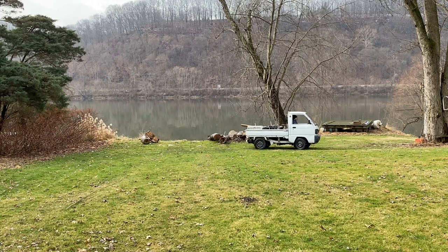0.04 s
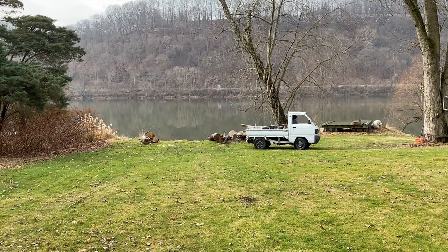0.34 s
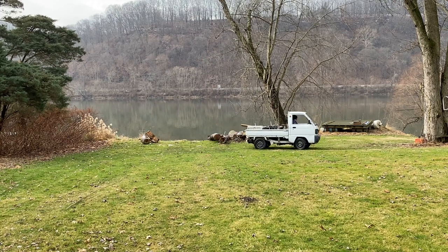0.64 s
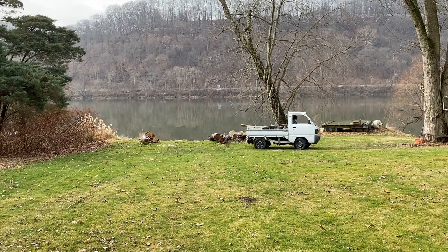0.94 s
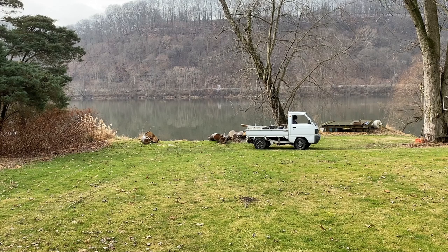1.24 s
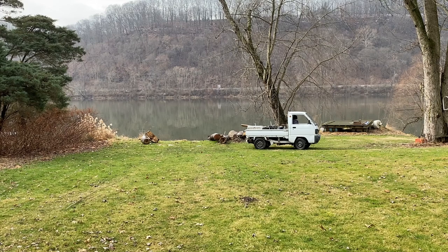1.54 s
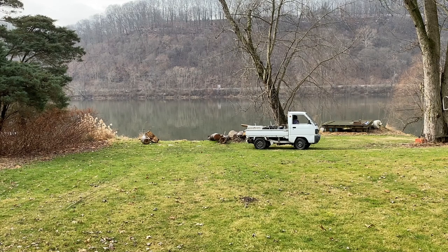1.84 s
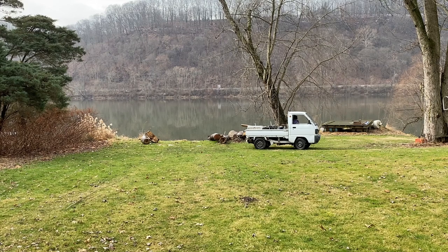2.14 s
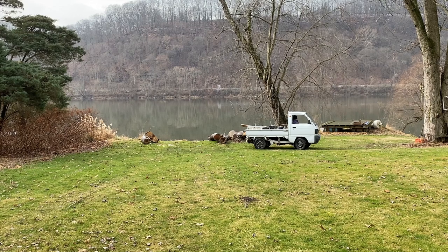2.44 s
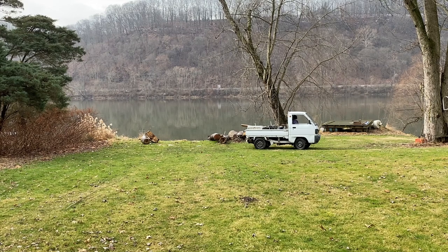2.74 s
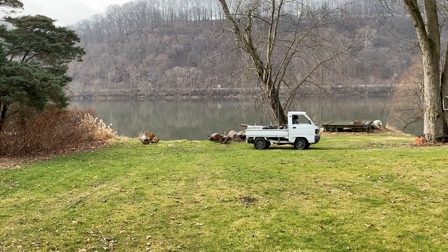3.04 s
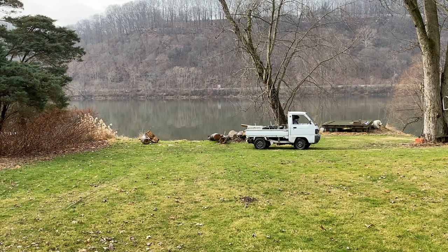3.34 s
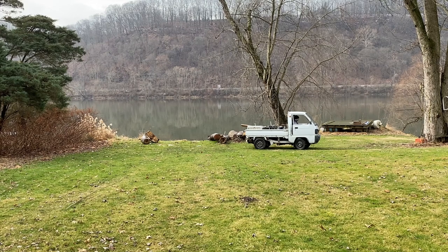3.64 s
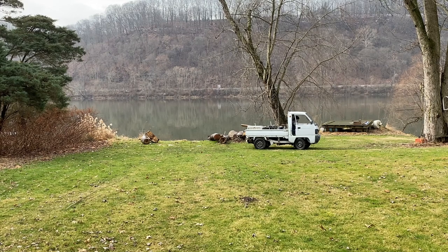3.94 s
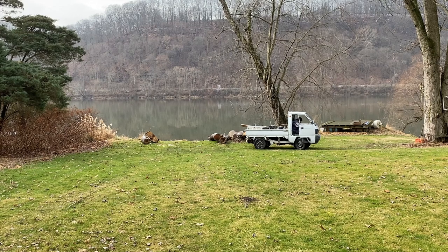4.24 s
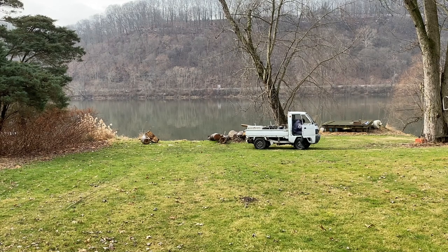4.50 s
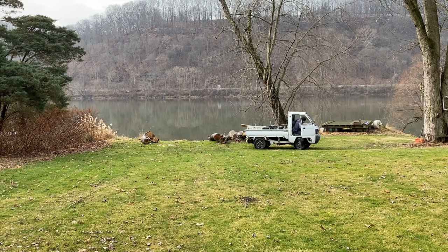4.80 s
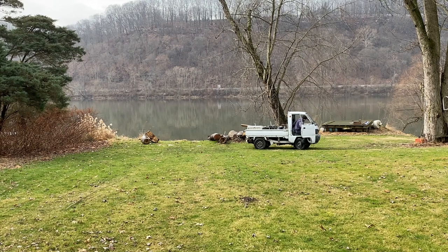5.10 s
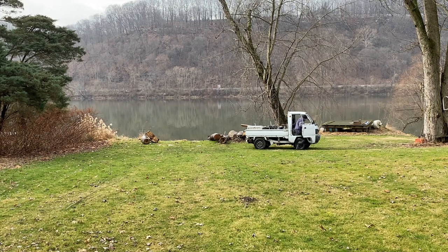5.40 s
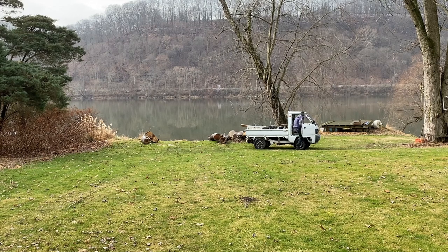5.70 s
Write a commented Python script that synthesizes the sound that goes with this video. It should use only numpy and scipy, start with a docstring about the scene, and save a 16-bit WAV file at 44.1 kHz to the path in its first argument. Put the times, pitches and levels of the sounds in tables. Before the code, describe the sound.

A small truck idles for an instant, then is switched off and runs down in slowing puffs as its bed shudders and rattles. The door latch snaps sharply, the hinge gives tiny squeaks, and hollow knocks and a deep thud come from the cab. Cloth rustles faintly at the end. It is heard from some way off outdoors, with small birds calling over a low, distant valley hum.

```python
"""A small three-cylinder truck idles some way off on a lawn by a river, over a far valley hum.
Switched off, it runs down: slowing puffs ring the exhaust, and the bed shudders, thumps and groans.
Small birds start calling from the trees. As the engine stops, the door latch snaps and the cab booms.
The door squeaks open on its dry hinge, and knocks ring and rattle the cab's panels.
Last, cloth rustles on the seat."""
import sys
import numpy as np
from scipy import signal
from scipy.fft import rfft, irfft, next_fast_len
from scipy.io import wavfile
from scipy.ndimage import uniform_filter1d

SR = 44100
rng = np.random.default_rng(int(sys.argv[2]) if len(sys.argv) > 2 else 0)


def inscribe(sig):
    """Save sig as 16-bit PCM at rate SR to the path in sys.argv[1].

    A 1-D sig is mono; a 2-D sig holds one channel per row.
    Samples are clipped to [-1, 1] before scaling.
    """
    pcm = np.round(np.clip(np.atleast_2d(sig).T, -1, 1) * 32767)
    wavfile.write(sys.argv[1], SR, pcm.astype(np.int16))


N = 258423
TIME = np.arange(N) / SR


def from_db(db):
    """Decibels to gain."""
    return 10 ** (np.asarray(db) / 20)


def rms_one(x):
    """Scale to unit power."""
    return x / np.sqrt(np.mean(x ** 2) + 1e-20)


def even(x):
    """Hold at unit power, keeping only the fast throb."""
    return x / np.sqrt(np.abs(uniform_filter1d(x ** 2, SR // 6)) + 1e-14)


def gain_curve(rows):
    """Per-sample gain from (time [s], level [dB])."""
    return from_db(np.interp(TIME, *np.transpose(rows)))


def at_hz(rows, hz):
    """Read a table on a log-frequency axis."""
    row_hz, values = np.transpose(rows)
    return np.interp(np.log(hz), np.log(row_hz), values)


def add(out, start_s, sound):
    """Mix a sound in at start_s."""
    i = int(start_s * SR)
    out[..., i:i + sound.shape[-1]] += sound[..., :N - i]


def pan(left_db):
    """Channel gains, left over right by left_db."""
    return from_db(np.array([[left_db], [-left_db]]) / 2)


def drift(rate_hz, count=N):
    """Random wander between unit-spread knots."""
    knots = rng.standard_normal(2000)
    return np.interp(TIME[:count] * rate_hz, np.arange(len(knots)), knots)


def cut(x, hz, kind, order=2):
    """Butterworth low- or high-pass."""
    return signal.sosfilt(signal.butter(order, hz, kind, fs=SR, output="sos"), x)


def noise(spectrum, likeness, count=N):
    """Unit-power stereo noise of given spectrum and left-right correlation."""
    size = next_fast_len(count)
    hz = np.maximum(np.arange(size // 2 + 1) * SR / size, 1)
    mid, side = rfft(rng.standard_normal((2, size)))
    alike = at_hz(likeness, hz)
    pair = np.sqrt(1 + alike) * mid + np.sqrt(1 - alike) * side * [[1], [-1]]
    return rms_one(irfft(pair * from_db(at_hz(spectrum, hz)), size)[:, :count])


def resonate(x, modes):
    """Drive parallel band-pass resonances."""
    out = 0
    for hz, width_hz, db in modes:
        r = np.exp(-np.pi * width_hz / SR)
        zeros = np.array([1, 0, -1]) * (1 - r * r) / 2
        poles = [1, -2 * r * np.cos(2 * np.pi * hz / SR), r * r]
        out = out + from_db(db) * signal.lfilter(zeros, poles, x + 1e-18)
    return out


def struck(blows, modes, spread_db=2):
    """Blows (time [s], level [dB]) ring every mode, each with slightly different weights."""
    times_s, blow_db = np.transpose(blows)
    weights_db = rng.normal(0, spread_db, (len(blows), len(modes)))
    out = np.zeros(N)
    for k, (hz, db, t60_s) in enumerate(modes):
        clicks = np.full(N, 1e-18)
        clicks[(times_s * SR).astype(int)] = (-1) ** k * from_db(blow_db + db + weights_db[:, k])
        r, w = from_db(-60 / (t60_s * SR)), 2 * np.pi * hz / SR
        out += signal.lfilter([0, np.sin(w)], [1, -2 * r * np.cos(w), r * r], clicks)
    return out


def glide(length_s, pitches_hz):
    """Phase and rounded envelope of a tone curving through pitches evenly spaced in time."""
    progress = np.linspace(0, 1, int(length_s * SR))
    curve = np.polyfit(np.linspace(0, 1, len(pitches_hz)), pitches_hz, len(pitches_hz) - 1)
    phase = 2 * np.pi * np.cumsum(np.polyval(curve, progress)) / SR
    return phase, np.abs(np.sin(np.pi * progress))


def notes(rows, pitch_ratios, waver_rad, waver_hz=400):
    """Wavering sine notes sharing one pitch contour."""
    out = np.zeros(N)
    for s, length_s, hz, db in rows:
        phase, swell = glide(length_s, hz * np.array(pitch_ratios))
        add(out, s, from_db(db) * swell * np.sin(phase + waver_rad * drift(waver_hz, len(phase))))
    return out


# air spectrum: (frequency [Hz], density [dB])
AIR = [(20, -37), (40, 0.5), (71, 1.5), (120, -4.5), (250, -17.5), (500, -22), (900, -26), (1300, -33.5),
       (2000, -37), (4000, -44.5), (7000, -50), (10500, -51.5), (15000, -75)]
# left-right likeness of the air: (frequency [Hz], correlation)
AIR_LIKENESS = [(60, 0.98), (250, 0.75), (700, 0.022), (2000, 0.076), (8000, 0.1)]
def valley_air(level_db=-61):
    """Far valley hum, gently wandering in level."""
    return from_db(level_db + drift(24) + 1.3 * drift(8.5)) * noise(AIR, AIR_LIKENESS)


IDLE_HZ, IGNITION_OFF_S = 50.6, 0.165
def firing_hz(friction_hz_per_s=17, drag_per_s=0.2):
    """Steady idle; with the ignition cut, dry friction and drag bring the engine to rest."""
    coasting_s = np.maximum(TIME - IGNITION_OFF_S, 0)
    offset_hz = friction_hz_per_s / drag_per_s
    return np.maximum((IDLE_HZ + offset_hz) * np.exp(-drag_per_s * coasting_s) - offset_hz, 0)


def cylinder_puffs(cycles, speed, jitter_cycles=0.022, imbalance_db=(3, -3, 0)):
    """One impulse per stroke; the slower the engine, the more unevenly its cylinders chug."""
    stroke = np.maximum.accumulate(np.floor(cycles + jitter_cycles * speed * drift(40)))
    limp_db = np.take(imbalance_db, stroke.astype(int) % 3) * (1 - speed)
    return np.diff(stroke, prepend=stroke[0]) * from_db(limp_db + drift(50.1))


# pipe resonances: (frequency [Hz], width [Hz], gain [dB])
PIPE_MODES = [(86, 12.5, 18), (166, 10.2, 3)]
# exhaust envelope: (time [s], level [dB])
EXHAUST_LEVEL = [(0.0, -40), (0.1, -38), (0.14, -40.5), (0.18, -35.5), (0.47, -34.5), (0.73, -41),
                 (0.77, -36.5), (0.9, -40.5), (0.97, -38), (1.09, -39.5), (1.13, -42), (1.32, -44.5),
                 (1.41, -43.5), (1.5, -46.5), (1.58, -44.5), (1.66, -50.5), (1.78, -47), (2.02, -63.5),
                 (2.3, -70)]
def exhaust(puffs):
    """Puffs ring the exhaust pipe."""
    pipe = cut(resonate(puffs, PIPE_MODES), 178, "low", order=4)
    return gain_curve(EXHAUST_LEVEL) * even(cut(pipe, 66.3, "high", order=4))


# bed and cab resonances: (frequency [Hz], width [Hz], gain [dB])
BODY_MODES = [(173, 82, -1), (247, 54, 2), (328.7, 25, 5), (367, 26, -8.5), (483, 36, -2),
              (551.6, 5.7, -16.5), (637, 16, -11.5), (872, 13, -20.5)]
# shudder envelope: (time [s], relative level [dB])
SHUDDER_LEVEL = [(0.0, -44), (0.11, -44.5), (0.28, -51.5), (0.4, -49.5), (0.5, -49.5), (0.57, -45),
                 (0.78, -51), (0.88, -56), (1.1, -61), (1.31, -62), (1.38, -55.5), (1.48, -53.5),
                 (1.51, -49.5), (1.62, -51.5), (1.71, -58.5), (1.79, -47.5), (1.96, -48), (2.14, -50),
                 (2.21, -58), (2.35, -63.5)]
# left-right likeness of the truck: (frequency [Hz], correlation)
TRUCK_LIKENESS = [(250, 1), (700, 0.85), (2000, 0.89), (4000, 1), (8000, 0.084)]
def shudder(phase, speed, throb=0.43, trim_db=-0.5):
    """Loose panels chatter in time with the puffs and shake the body."""
    pulsing = np.exp(throb * np.minimum(2 * speed, 1) * (np.cos(phase) - 0.5))
    chatter = noise([(100, 0), (1000, 0.014)], TRUCK_LIKENESS) * pulsing
    body = rms_one(cut(resonate(chatter, BODY_MODES), 617, "low", order=4))
    return from_db(trim_db) * gain_curve(SHUDDER_LEVEL) * body


# engine hiss spectrum: (frequency [Hz], density [dB])
HISS = [(410, -7.5), (700, -4), (871, -10.5), (1230, -12.5), (1630, -15.5), (2730, -9), (4210, -12.5),
        (6190, -18.5), (8110, -30), (10500, -28), (13200, -40), (15000, -35)]
def hiss(phase, speed, idle_db=-59, throb=0.15):
    """Hiss pulses with the puffs and fades with speed."""
    pulsing = 1 + throb * np.cos(phase)
    return from_db(idle_db + drift(59.4)) * speed ** 1.494 * pulsing * noise(HISS, TRUCK_LIKENESS)


# fan fizz spectrum: (frequency [Hz], density [dB])
FIZZ = [(7500, -29), (10500, 0), (14000, -7), (16000, -20)]
def fan_fizz(speed, idle_db=-78):
    """Fine fizz of the fan, heard only near idle."""
    return from_db(idle_db) * speed ** 7.6 * noise(FIZZ, TRUCK_LIKENESS)


def fan_whine(phase, speed, idle_db=-63, octave_db=-16, waver_rad=0.8):
    """The belt-driven fan whines well above the firing rate."""
    fan_phase = 14.5 * phase + waver_rad * drift(130)
    tone = np.sin(fan_phase) + from_db(octave_db) * np.sin(2 * fan_phase)
    return from_db(idle_db) * speed ** 2.3 * np.sqrt(2) * tone


# engine on rubber mounts: (frequency [Hz], width [Hz], gain [dB])
MOUNT_MODES = [(41.5, 25, 0)]
def rocking(puffs, speed, level_db=-41):
    """With the ignition cut, bare compression rocks the engine on its mounts."""
    unfired = np.interp(TIME, [IGNITION_OFF_S - 0.04, IGNITION_OFF_S], [0, 1])
    mounts = even(cut(resonate(puffs, MOUNT_MODES), 65, "low", order=4))
    return from_db(level_db) * unfired * speed ** 2.23 * mounts


def engine():
    """The firing rate drives every engine layer; all fade out just before rest."""
    rate_hz = firing_hz()
    speed = rate_hz / IDLE_HZ
    cycles = np.cumsum(rate_hz) / SR
    phase = 2 * np.pi * cycles
    puffs = cylinder_puffs(cycles, speed)
    lows = exhaust(puffs) + shudder(phase, speed) + rocking(puffs, speed)
    highs = (hiss(phase, speed) + fan_fizz(speed)) * pan(2) + fan_whine(phase, speed)
    return (lows + highs) * np.interp(TIME, [2.3, 2.46], [1, 0])


def tree_echoes(x, t60_s=0.37, first_s=0.012):
    """Trunks scatter many faint echoes."""
    t = TIME[:SR]
    sparse = rng.standard_normal((2, SR)) * (rng.random((2, SR)) < 0.05)
    echoes = rms_one(sparse * from_db(-60 * t / t60_s) * (t > first_s)) / np.sqrt(SR)
    return signal.fftconvolve(np.atleast_2d(x), echoes, axes=-1)[:, :N]


# spectra of a blow's panel, clack and bright edge: (frequency [Hz], density [dB])
PANEL = [(120, 7.5), (250, 7), (340, 3.5), (480, -3.5), (720, -12.5), (1100, -16), (2000, -60)]
CLACK = [(400, -1), (900, -6.5), (1200, -6), (1380, -3), (1580, 0.5), (1900, 0), (2300, -5), (2900, -17),
         (4500, -30), (8000, -50)]
EDGE = [(1500, 1), (3200, 4), (4600, -1), (7000, -10), (8800, -28), (14000, -19), (18000, -30)]
DOOR_PANEL_HZ = 277
def rattles(blows, attack_s=0.00054, tail_db=-22, tail_t60_s=0.35, flutter_db=1.5):
    """Each blow shakes panels, latch and small fittings in a dying noise burst."""
    out, t = np.zeros((2, N)), TIME[:SR // 2]
    attack = 1 - np.exp(-t / attack_s)
    tail = from_db(tail_db - 60 * t / tail_t60_s)
    for s, panel_db, clack_db, edge_db, t60_s, panel_hz in blows:
        tuned = [(hz * panel_hz / DOOR_PANEL_HZ, db) for hz, db in PANEL]
        panel = from_db(panel_db) * noise(tuned, TRUCK_LIKENESS, len(t)) * pan(-1)
        clack = from_db(clack_db) * noise(CLACK, TRUCK_LIKENESS, len(t))
        edge = from_db(edge_db) * noise(EDGE, TRUCK_LIKENESS, len(t)) * pan(3)
        decay = np.hypot(from_db(-60 * t / t60_s), tail)
        add(out, s, (panel + clack + edge) * attack * decay)
    return out * from_db(flutter_db * drift(390))


# engine jolts: (time [s], thump [dB], edge [dB])
JOLTS = [(0.602, -47.5, -65), (0.687, -45.5, -84), (1.347, -55, -70), (1.495, -47, -64.5), (1.55, -48, -83),
         (1.742, -53.5, -71.5), (1.794, -50, -70), (1.82, -61, -67), (1.863, -58, -89),
         (1.903, -52.5, -63.5), (1.93, -47, -73), (1.995, -58, -68), (2.101, -55, -72.5),
         (2.123, -49.5, -81)]
def jolts(rattle_t60_s=0.3, bed_hz=281):
    """The stopping engine jolts its mounts; the bed thumps and rattles."""
    modes = [(hz, db, np.log(1000) / (np.pi * width_hz)) for hz, width_hz, db in BODY_MODES]
    thumps = struck([(s, db) for s, db, _ in JOLTS], modes)
    return thumps + rattles([(s, db + 5.5, db - 5.5, db, rattle_t60_s, bed_hz) for s, _, db in JOLTS])


# bed panel tones: (time [s], length [s], pitch [Hz], level [dB])
GROANS = [(.66, 0.18, 351.7, -49.5), (1.485, 0.071, 557, -54), (1.49, 0.14, 334.8, -50),
          (1.59, 0.13, 345, -52.5), (1.77, 0.11, 337.6, -49), (1.81, 0.44, 636, -63.5),
          (1.91, 0.098, 347, -49), (1.99, 0.16, 328.6, -51)]
def groans():
    """Bed panels catch the shudder and sing briefly."""
    return notes(GROANS, (0.99, 1.01, 0.99), waver_rad=0.5, waver_hz=55)


def from_trees(call, echo_db, left_db=7):
    """A bird call from the left, smeared by the wood."""
    return call * pan(left_db) + from_db(echo_db) * tree_echoes(call) * pan(left_db / 2)


# thin calls: (time [s], length [s], pitch [Hz], level [dB])
SEEPS = [(.716, 0.067, 7670, -60.5), (.882, 0.12, 7750, -64.5), (1.973, 0.08, 4140, -75.5),
         (2.208, 0.071, 7300, -87), (2.384, 0.05, 4060, -74), (3.08, 0.049, 7720, -67.5),
         (3.186, 0.12, 4230, -81), (4.706, 0.027, 7410, -62)]
def bird_seeps():
    """Thin calls of nearly level pitch."""
    return from_trees(notes(SEEPS, (1.03, 1, 0.98), waver_rad=0.34), echo_db=1)


# dry ticks: (time [s], relative level [dB])
TICKS = [(0.877, -58), (1.32, -69.5), (1.408, -70), (1.46, -62), (1.513, -73), (1.572, -68), (1.636, -66),
         (1.703, -71), (1.766, -63.5), (1.836, -70), (1.903, -74), (2.192, -77), (4.0587, -67), (4.59, -82),
         (5.6234, -76)]
def ticks(trim_db=-8, t60_s=0.064):
    """Tiny bright ticks, most in step with the engine's last strokes."""
    envelope = np.zeros(N)
    for s, db in TICKS:
        add(envelope, s, from_db(db + trim_db - 60 * TIME[:SR // 4] / t60_s))
    spectrum = [(4000, -47), (8600, -2), (10200, 17), (11800, -4), (14000, 8), (18000, -19)]
    return envelope * noise(spectrum, AIR_LIKENESS)


# far whistles: (time [s], length [s], pitch [Hz], level [dB])
WHISTLES = [(1.0, 0.077, 2670, -75), (1.17, 0.043, 2620, -72), (1.365, 0.058, 2500, -73),
            (1.6, 0.041, 2470, -70), (1.65, 0.078, 2190, -74.5), (1.74, 0.051, 2520, -76),
            (5.185, 0.063, 4760, -82), (5.21, 0.11, 3290, -78.5), (5.29, 0.037, 2760, -78.5),
            (5.33, 0.092, 3210, -81.5), (5.41, .045, 2820, -86)]
def bird_whistles():
    """Far, slightly hoarse falling whistles."""
    return from_trees(notes(WHISTLES, (1.035, 1, 0.95), waver_rad=0.85), echo_db=1)


# cab modes: (frequency [Hz], gain [dB], t60 [s])
CAB_MODES = [(90.3, -22, 0.13), (127.1, 0.5, 0.2), (142.4, -3.5, 0.39), (178, -5.5, 0.25),
             (229, -9.5, 0.29), (295.6, -11.5, 0.28), (347, -19.5, 0.097), (401, -19.5, 0.23)]
BOOM_CUTOFF_HZ = 450
def cab_boom(blows):
    """Blows ring the cab's low modes."""
    return cut(struck(blows, CAB_MODES), BOOM_CUTOFF_HZ, "low")


# door skin modes: (frequency [Hz], gain [dB], t60 [s])
DOOR_MODES = [(515, -1.5, 0.22), (619, 5.5, 0.098), (739, -1.5, 0.068), (853, -4.5, 0.16),
              (906, -3.5, 0.21), (995, -12, 0.24), (1233, -7.5, 0.22), (1612, 5, 0.12), (1680, -7, .1),
              (1845, -0.5, 0.12), (1880, 7, 0.069), (2050, 2, 0.15), (2215, 5.5, 0.085), (2483, -3.5, 0.11),
              (3440, -8.5, 0.071)]
def door_skin(blows, gain_db=-16):
    """Clacks ring the door skin."""
    return from_db(gain_db) * struck(blows, DOOR_MODES) * pan(-1)


# cab knocks: (time [s], boom [dB], panel [dB], clack [dB], edge [dB], t60 [s], panel pitch [Hz])
KNOCKS = [(2.378, -67, -55.5, -73.5, -77, 1, 251), (2.513, -59, -52, -58, -68, 0.086, 380),
          (2.618, -54.5, -52.5, -65.5, -83, 0.2, 244), (2.662, -61, -60, -71, -85, 0.11, 241),
          (2.68, -55.5, -79, -67.5, -76, 0.21, 250), (2.711, -58, -65, -68.5, -80, 0.11, 250),
          (2.757, -56.5, -65, -76, -81, 0.075, 250), (3.151, -58, -49.5, -54.5, -63, .11, 484),
          (3.17, -46.5, -40, -79, -81, 0.056, 185), (3.197, -59, -48, -65, -65, 0.12, 376),
          (3.221, -47, -52, -77, -87, 0.21, 250), (3.415, -54.5, -60, -83, -79.5, 0.61, 298),
          (3.441, -52.5, -51, -67, -72, 0.36, 420), (3.462, -75, -54, -69, -63, 0.063, 427),
          (3.537, -58.5, -74, -69, -73.5, 0.16, 397), (3.846, -57, -57, -66.5, -76, 0.22, 250),
          (3.917, -50.5, -54, -89, -91, 0.38, 200), (4.015, -40, -50, -79, -75.5, 0.68, 214),
          (4.047, -45, -70, -79, -63.5, 0.2, 257), (4.427, -75.5, -54.5, -65, -83, 0.15, 618),
          (4.443, -70, -59, -80, -90, 0.16, 442), (4.796, -58.5, -73, -70.5, -73.5, 0.032, 253),
          (5.038, -67, -71, -81, -83, 0.28, 230), (5.607, -68, -87, -82, -93, 1, 243)]
def knocks():
    """Knocks boom in the cab, ring the door and rattle the fittings."""
    boom = cab_boom([(s, db) for s, db, *_ in KNOCKS])
    door = door_skin([(s, clack_db) for s, _, _, clack_db, *_ in KNOCKS])
    return boom + door + rattles([(s, *burst) for s, _, *burst in KNOCKS])


# latch snaps: (time [s], boom [dB], panel [dB], clack [dB], edge [dB], t60 [s])
LATCHES = [(2.4581, -35.5, -46.5, -32, -48, 0.065), (3.141, -43.5, -49, -55, -54.5, 0.1)]
def door_latch(boom_lag_s=0.0086, rebound_lag_s=0.039, rebound_t60_s=0.21):
    """The latch snaps, the cab booms, the door rebounds softly."""
    rebound_db = (-49.5, -72, -71.5)  # panel, clack, edge
    snaps = [(s, *burst, DOOR_PANEL_HZ) for s, _, *burst in LATCHES]
    rebounds = [(s + rebound_lag_s, *rebound_db, rebound_t60_s, DOOR_PANEL_HZ) for s, *_ in LATCHES]
    boom = cab_boom([(s + boom_lag_s, db) for s, db, *_ in LATCHES])
    door = door_skin([(s, clack_db) for s, _, _, clack_db, *_ in LATCHES])
    return boom + door + rattles(snaps + rebounds)


# bolt strikes: (time [s], level [dB])
BOLT_SNAPS = [(2.4588, -59), (3.139, -55), (3.147, -57), (3.194, -61)]
# bolt modes: (frequency [Hz], gain [dB], t60 [s])
BOLT_MODES = [(2940, -4, 0.06), (3070, -3, 0.06), (3310, 0, 0.06), (3730, -13, 0.046), (3760, -12.5, 0.13)]
def latch_bolt():
    """The bolt springs, strikes and rings."""
    return struck(BOLT_SNAPS, BOLT_MODES)


# hinge squeaks: (time [s], length [s], start [Hz], middle [Hz], end [Hz], level [dB])
SQUEAKS = [(2.856, 0.048, 1697, 1690, 1840, -69), (2.882, 0.037, 1810, 2080, 2440, -67),
           (4.047, 0.0099, 2290, 2920, 3970, -64), (4.059, 0.0021, 2480, 2650, 3660, -47)]
def hinge_squeaks(octave_db=-14, grip_spread_db=4):
    """The dry hinge sticks and slips in short, ragged, rising tones."""
    out = np.zeros(N)
    for s, length_s, *pitches_hz, db in SQUEAKS:
        phase, swell = glide(length_s, pitches_hz)
        phase += drift(700, len(phase))
        grip_db = grip_spread_db * drift(180, len(phase))
        tone = np.sin(phase) + from_db(octave_db) * np.sin(2 * phase)
        add(out, s, from_db(db + grip_db) * swell * tone)
    return out


# panel raps: (time [s], level [dB])
RAPS = [(3.441, -58), (3.452, -49), (3.466, -53.5), (3.49, -58), (4.43, -66)]
# hollow panel modes: (frequency [Hz], gain [dB], t60 [s])
HOLLOW_MODES = [(216.7, -3.5, 0.18), (439, -6.5, 0.12), (563, -4.5, 0.14), (686, -2.5, 0.087),
                (824, -18, 0.19)]
def panel_raps():
    """Raps ring a hollow panel."""
    return struck(RAPS, HOLLOW_MODES) * pan(-1)


# loud chips: (time [s], length [s], pitch [Hz], level [dB])
CHIPS = [(3.492, .077, 6530, -60.5), (3.616, .057, 6080, -63)]
def bird_chips():
    """Chips that arch up and down in pitch."""
    return from_trees(notes(CHIPS, (0.7, 0.98, 1, 0.92, 0.6), waver_rad=0.27), echo_db=-1)


# scolding notes: (time [s], length [s], level of partial 9 [dB])
SCOLDS = [(3.646, 0.13, -76.5), (3.804, 0.15, -76.5), (3.994, 0.12, -79.5)]
def bird_scolds(pitches_hz=(462, 447, 430), tilt_db=-2.5, fading_db=4, rasp_rad=0.32):
    """Hoarse nasal stacks of high partials, each fading in and out through the wood."""
    out = np.zeros(N)
    for s, length_s, db in SCOLDS:
        phase, swell = glide(length_s, pitches_hz)
        n = len(phase)
        phase += 0.5 * drift(45, n)
        for k in range(8, 15):
            gain = from_db(db + tilt_db * abs(k - 9) + fading_db * drift(35, n))
            add(out, s, gain * swell * np.sin(k * phase + rasp_rad * drift(500, n)))
    return from_trees(out, echo_db=-2)


# sway modes: (frequency [Hz], gain [dB], t60 [s])
SWAY_MODES = [(59.2, 0, .26), (118, 1, .3)]
def cab_sway(start_s=4.034, level_db=-38):
    """One deep thud as the cab sways."""
    return cut(struck([(start_s, level_db)], SWAY_MODES), BOOM_CUTOFF_HZ, "low")


# cloth spectrum: (frequency [Hz], density [dB])
CLOTH = [(1000, -17), (3300, 8), (6000, -4), (9000, -10), (13500, -2), (16000, -14)]
def seat_rustle(start_s=5.49, length_s=0.41, level_db=-82.5, grain_db=3):
    """Soft, grainy rustle as the driver shifts in the seat."""
    swell = np.sin(np.pi * np.clip((TIME - start_s) / length_s, 0, 1))
    return from_db(level_db + grain_db * drift(50)) * swell * noise(CLOTH, AIR_LIKENESS)


def scene():
    """Truck, echoes and air slightly right; birds left."""
    air = valley_air()
    truck = engine() + jolts() + groans()
    truck += knocks() + door_latch() + latch_bolt() + hinge_squeaks() + panel_raps() + cab_sway()
    echoes = from_db(-12) * tree_echoes(cut(truck, 490, "high"))
    birds = bird_seeps() + bird_whistles() + bird_chips() + bird_scolds()
    return (air + truck + echoes) * pan(-1.5) + birds + ticks() + seat_rustle()


def record(dry):
    """Drop the deepest bass and the top."""
    low_pass = signal.cheby2(12, 60, 16200, fs=SR, output="sos")
    return signal.sosfilt(low_pass, cut(dry, 28, "high"))


dry = scene()
out = record(dry)
inscribe(out)
```